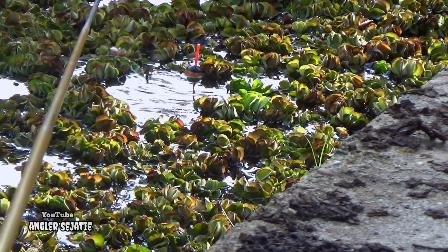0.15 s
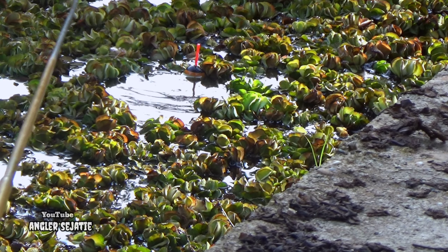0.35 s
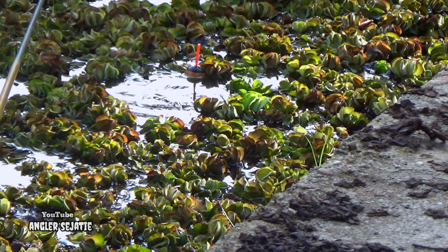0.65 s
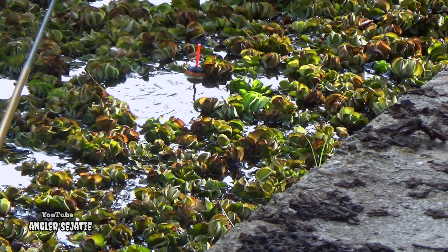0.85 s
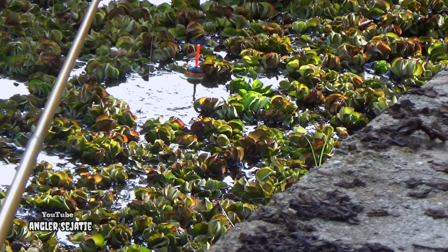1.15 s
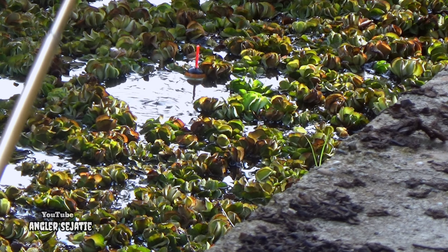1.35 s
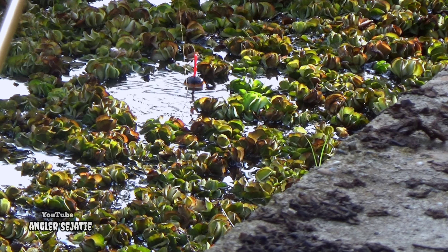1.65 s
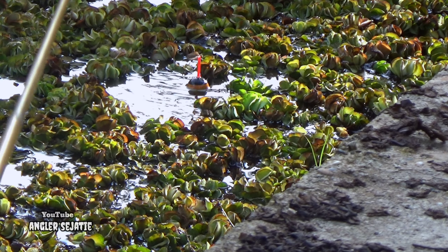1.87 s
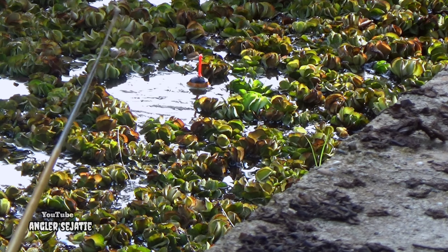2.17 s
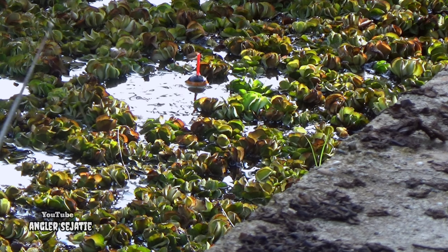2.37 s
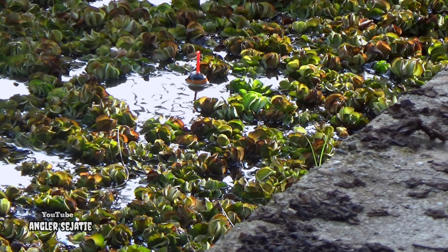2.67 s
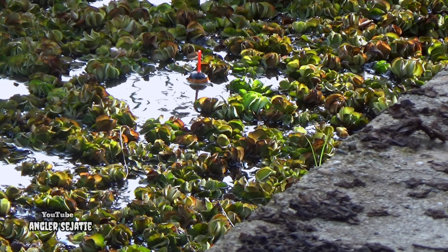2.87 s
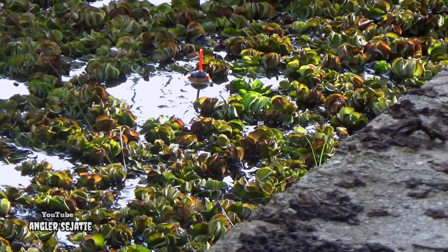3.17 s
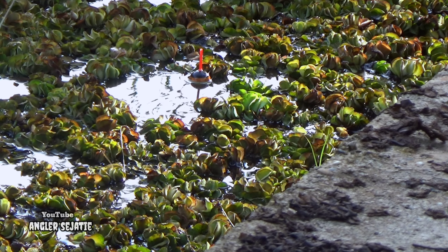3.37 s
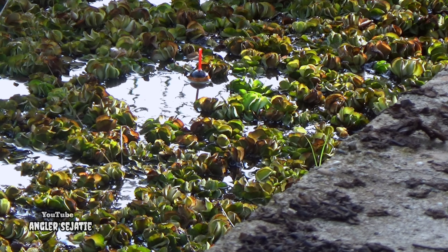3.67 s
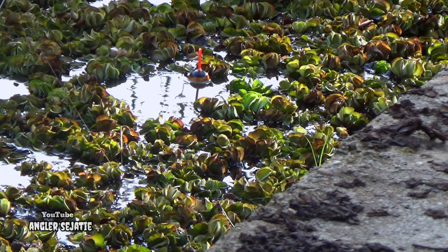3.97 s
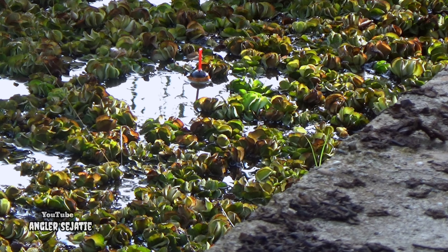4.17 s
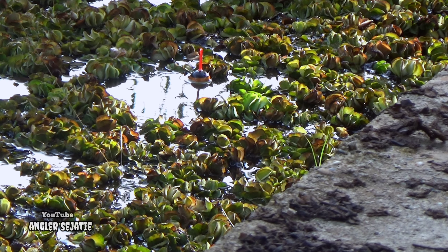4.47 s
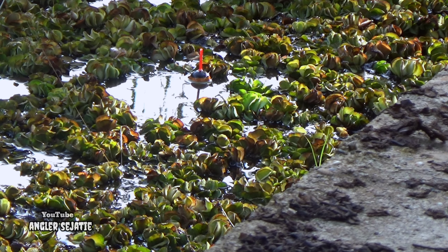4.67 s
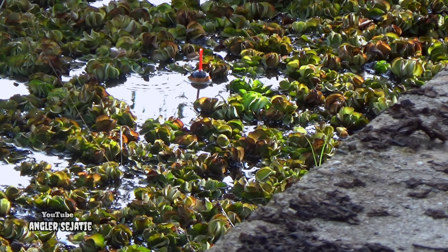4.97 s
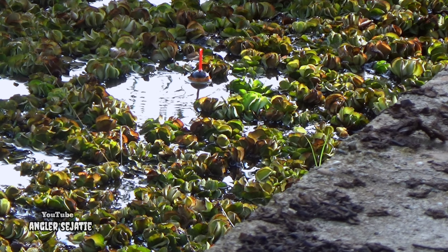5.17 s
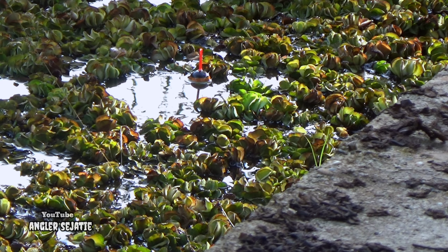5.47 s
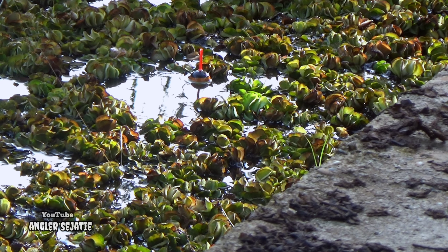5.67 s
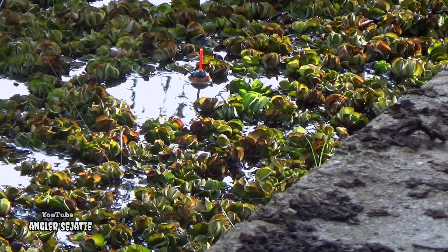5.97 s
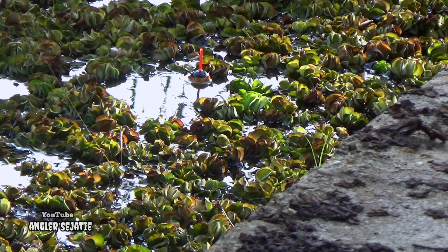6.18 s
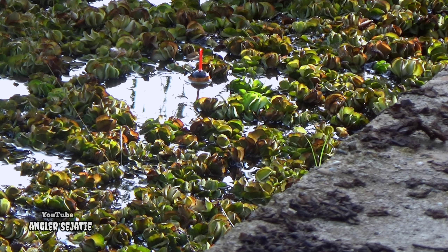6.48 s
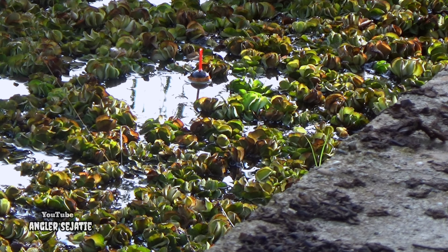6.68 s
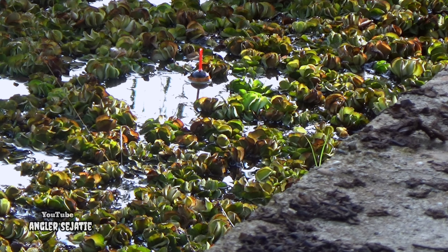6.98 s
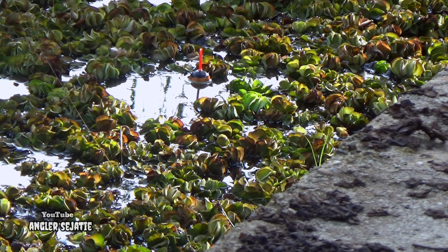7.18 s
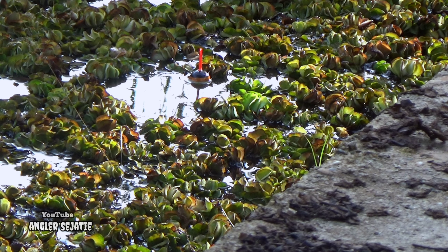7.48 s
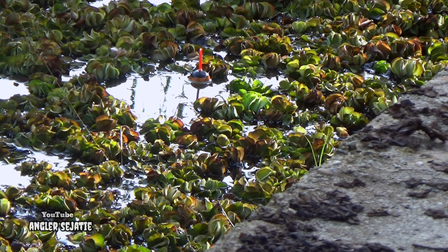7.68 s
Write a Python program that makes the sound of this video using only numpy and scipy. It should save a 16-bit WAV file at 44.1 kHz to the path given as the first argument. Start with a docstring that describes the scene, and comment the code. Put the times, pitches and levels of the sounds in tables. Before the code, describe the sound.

Outdoors by a weedy canal, katydids and crickets drone high and steady over a dull rush of air and faint traffic hum. A small motor ticks rapidly close to the microphone for three seconds, ending around two handling knocks. Fishing gear taps and rustles, then snaps sharply once. A bird on the left whistles a short low phrase at the start, middle and later, with small distant birds chirping.

```python
"""A weedy canal in open country: a dull rush of air, a low rumble, a traffic hum and a faint far engine.
Katydids and crickets drone from the banks as coloured noise and narrow tones, pulsed by wing strokes.
A bird to the left repeats a low whistled phrase of gliding sines; others call far off, softened by echoes.
Close to the microphone a small camera motor ticks for three seconds, each step ringing its modes; the
handled camera knocks twice as a struck body; fishing gear rustles and snaps once in short noise bursts."""
import sys
import numpy as np
from scipy import signal
from scipy.fft import rfft, irfft, next_fast_len
from scipy.io import wavfile
from scipy.ndimage import uniform_filter1d

SR = 44100
rng = np.random.default_rng(int(sys.argv[2]) if len(sys.argv) > 2 else 0)


def master(y):
    """Save y as 16-bit WAV."""
    cut = np.clip(np.atleast_2d(y).T, -1, 1)
    pcm = np.round(cut * 32767)  # scale
    wavfile.write(sys.argv[1], SR, pcm.astype(np.int16))


N = 345303
T = np.arange(N) / SR


def from_db(db):
    """Amplitude ratio of a level in dB."""
    return 10 ** (np.asarray(db) / 20)


def rms_one(x):
    """Scale a signal to an rms of 1."""
    return x / np.sqrt(np.mean(x ** 2) + 1e-20)


def in_time(rows, t=T):
    """The columns of a curve at the times t."""
    s, *columns = np.transpose(rows)
    return [np.interp(t, s, column) for column in columns]


def at_hz(points, hz):
    """A spectrum read on a log-frequency axis."""
    f, value = np.transpose(points)
    return np.interp(np.log(hz + 1), np.log(f), value)


def pan(x, left_db):
    """Place a sound between the two channels; left_db is how much louder the left one is."""
    return x * from_db([[left_db / 2], [-left_db / 2]])


# Left-right likeness of the noises: [f/Hz, correlation]
LEFT_RIGHT_LIKENESS = [(100, 0.99), (180, 0.98), (350, 0.28), (800, 0.086), (2000, 0.061), (5000, 0.69),
                       (9000, 0.72), (12000, 1)]


def noise(spectrum, size=N):
    """Stereo noise of a given colour, more alike in both channels at the ends of the range; mid rms 1."""
    padded = next_fast_len(size)
    hz = np.arange(padded // 2 + 1) * SR / padded
    alike = np.clip(at_hz(LEFT_RIGHT_LIKENESS, hz), 0, 1)
    mid, side = rfft(rng.standard_normal((2, padded))) * from_db(at_hz(spectrum, hz))
    side = side * np.sqrt((1 - alike) / (1 + alike))
    mid, side = irfft(np.array([mid, side]), padded)[:, :size]
    return np.array([mid + side, mid - side]) / mid.std()


def ring(clicks, hz, t60):
    """A two-pole resonance: a unit click sets a sine of height 1 ringing, 60 dB down after t60 s."""
    radius = from_db(-60 / (t60 * SR))
    angle = 2 * np.pi * hz / SR
    poles = [1, -2 * radius * np.cos(angle), radius * radius]
    return signal.lfilter([0, np.sin(angle)], poles, clicks + 1e-18)


def tones(rows):
    """Sharp resonances driven unevenly by noise: narrow wavering lines."""
    out = 0
    for hz, width, db in rows:
        t60 = np.log(1000) / np.pi / width
        out = out + from_db(db) * rms_one(ring(rng.standard_normal(N), hz, t60))
    return out


def scatter(x, t60):
    """Diffuse echoes from banks and trees, different in each channel."""
    t = T[:SR]
    tail = rng.standard_normal((2, SR)) * from_db(-60 * t / t60) * (1 - np.exp(-t / 0.014))
    tail = tail / np.sqrt(np.sum(tail ** 2) / 2)
    return signal.fftconvolve(x[None], tail, axes=1)[:, :N]


def flutter(rate_hz):
    """Smooth chance that changes about rate_hz times a second; rms 1 over all its values."""
    knots = rng.standard_normal(400)
    return rms_one(np.interp(T * rate_hz, np.arange(len(knots)), knots))


def swells(rows, rise_db_per_s, fall_db_per_s, rest_db):
    """Gain of a sound that rises, holds and falls once for each row, and rests at a low level between."""
    levels = []
    for start, length, db in rows:
        before = np.maximum(start - T, 0)
        after = np.maximum(T - start - length, 0)
        levels.append(db - rise_db_per_s * before - fall_db_per_s * after)
    return from_db(np.maximum(np.max(levels, axis=0), rest_db))


# Colour of the open air: [f/Hz, level/dB per Hz]
AIR_COLOUR = [(60, -43), (200, -1), (300, 0), (600, 1), (790, 6.5), (1000, 1), (1500, -1), (2400, -2.5),
              (4000, -5.5), (6000, -8.5), (7500, -9), (13000, -12.5), (15500, -16.5)]


def open_air():
    """The dull rush of open country all around: steady coloured noise."""
    return from_db(-56.0) * pan(noise(AIR_COLOUR), left_db=0.06)


# Colour of the low rumble: [f/Hz, level/dB per Hz]
RUMBLE_COLOUR = [(20, -56), (50, -15), (85, -7.5), (120, -4.5), (150, 3.5), (200, -12), (320, -27.5)]
# The one swell of the rumble: [start t/s, length t/s, level/dB]
RUMBLE_SWELL = [(1.55, 1.33, -63.5)]
# Far traffic hum: [f/Hz, width f/Hz, level/dB]
TRAFFIC_HUM = [(136.9, 5.5, -79), (152.7, 8.2, -79)]


def rumble_and_hum():
    """Low noise that flutters slightly and swells once, with narrow hum lines from far traffic."""
    swell = swells(RUMBLE_SWELL, rise_db_per_s=68, fall_db_per_s=35, rest_db=-70)
    rumble = swell * from_db(.9 * flutter(rate_hz=4)) * noise(RUMBLE_COLOUR)
    return rumble + tones(TRAFFIC_HUM)


# Harmonics of the far engine: [multiple of the firing rate, relative level/dB]
ENGINE_HARMONICS = [(5, -7.5), (6, -0.5), (7, -6), (8, -1.5), (10, -1), (11, 2)]
ENGINE_PEAK_S, ENGINE_HALF_S = 2.55, .6
# level at the peak, and its change half a width away
ENGINE_DB, ENGINE_EDGE_DB = -70, -6
# firing rate at the peak, and its drop half a width away
ENGINE_FIRING_HZ, ENGINE_SAG_HZ = 30.47, 1.7


def far_engine():
    """Harmonics of a firing rate come and go far off, loudest when the engine runs fastest."""
    off_peak = np.minimum(((T - ENGINE_PEAK_S) / ENGINE_HALF_S) ** 2, 10)
    turn = 2 * np.pi * np.cumsum(ENGINE_FIRING_HZ - ENGINE_SAG_HZ * off_peak) / SR
    engine = 0
    for order, db in ENGINE_HARMONICS:
        engine = engine + from_db(db) * np.sin(round(order) * turn + rng.uniform(0, 2 * np.pi))
    return from_db(ENGINE_DB + ENGINE_EDGE_DB * off_peak ** 2) * engine


# Colours of the lower and higher crickets: [f/Hz, level/dB per Hz]
LOW_CRICKET_COLOUR = [(3900, -20.5), (4400, -5.5), (4600, 4.5), (4780, 0.5), (4930, -12), (5150, -35),
                      (5600, -35)]
HIGH_CRICKET_COLOUR = [(4600, -24), (4900, 2.5), (5100, -10), (5300, -9.5), (5600, -24)]
# Trills of the lower and higher crickets, before group gain: [start t/s, length t/s, level/dB]
LOW_CRICKET_TRILLS = [(-.1, .62, -60), (1.03, .6, -60.5), (2.05, 0.35, -62), (2.78, 0.65, -60.5),
                      (3.82, 0.65, -60.5), (4.92, 0.55, -60), (5.97, 0.73, -61), (6.72, 0.72, -60),
                      (7.76, .5, -61)]
HIGH_CRICKET_TRILLS = [(-.1, 0.47, -61), (.75, .68, -61.5), (2.13, 0.38, -60.5), (3.08, .52, -63),
                       (3.95, .42, -63.5), (4.73, 0.61, -63), (5.8, .55, -62.5), (6.78, 0.57, -60.5),
                       (7.74, .5, -67)]
TRILL_SWELL_DB_PER_S, TRILL_FADE_DB_PER_S = 70, 86


def crickets():
    """Two groups of distant crickets trill about once a second; farther ones fill the pauses."""
    low_gain = swells(LOW_CRICKET_TRILLS, TRILL_SWELL_DB_PER_S, TRILL_FADE_DB_PER_S, rest_db=-67.5)
    high_gain = swells(HIGH_CRICKET_TRILLS, TRILL_SWELL_DB_PER_S, TRILL_FADE_DB_PER_S, rest_db=-71)
    low = low_gain * noise(LOW_CRICKET_COLOUR)
    high = from_db(-2.5) * high_gain * noise(HIGH_CRICKET_COLOUR)
    return pan(low + high, left_db=0.9)


# Colour of the throbbing insect: [f/Hz, level/dB per Hz]
THROBBER_COLOUR = [(7800, -27), (8350, 4), (8750, -9), (9050, 5), (9400, -36)]
# Its pure tones, before the throb and a common gain: [f/Hz, width f/Hz, level/dB]
THROBBER_TONES = [(8445, 20, -57), (8756, 22, -55), (8695, 30, -63), (8637, 20, -64)]


def throbber(rest_db=-5.0, duty=0.41):
    """One insect chirps seventeen times a second, each chirp with a sharp start and stop."""
    cycle = (16.945 * T + .2) % 1
    gate = uniform_filter1d(np.where(cycle < duty, 1, from_db(rest_db)), size=130)
    song = from_db(-58.5) * noise(THROBBER_COLOUR) + from_db(-4) * tones(THROBBER_TONES)
    return rms_one(gate) * song


# The buzzer's wing resonances, each ring 60 dB down after 1/width: [f/Hz, width f/Hz, relative level/dB]
BUZZER_WING = [(10850, 330, -6), (11240, 350, -6), (11270, 460, -9), (11730, 210, -10)]


def buzz_wing(drive):
    """The wing resonances, each passed twice, shape the drive; rms 1."""
    out = 0
    for hz, width, db in BUZZER_WING:
        once = ring(drive, hz, 1 / width)
        out = out + from_db(db) * rms_one(ring(once, hz, 1 / width))
    return rms_one(out)


def buzzer():
    """One insect rasps its wings 138 times a second: each stroke is partly a click, partly friction."""
    rate_hz = 138.3 * (1 + .0007 * np.sin(2 * np.pi * .6 * T))
    cycle = np.cumsum(rate_hz) / SR % 1
    click = np.exp(-((cycle - .5) / .004) ** 2)
    friction = rng.standard_normal(N) * np.exp(0.44 * np.cos(2 * np.pi * (cycle - .6)))
    return buzz_wing(friction) + from_db(-9) * buzz_wing(click)


def wing_strokes(rate_hz, wander, sharpness):
    """One pulse of loudness for each stroke of a wing, at a slightly wandering rate; rms 1."""
    knots = np.arange(0, T[-1] + 1, .5)
    rate = rate_hz * (1 + wander * np.interp(T, knots, rng.standard_normal(len(knots))))
    return rms_one(np.exp(sharpness * np.cos(2 * np.pi * np.cumsum(rate) / SR)))


# Colour of the katydid chorus: [f/Hz, level/dB per Hz]
CHORUS_COLOUR = [(7400, -33.5), (7850, -23), (8100, -11.5), (8400, -2.5), (9100, -1.5), (9500, 3),
                 (9950, -0.5), (10400, -7.5), (11100, -36), (12100, -23), (12800, -31.5)]
# Effort of the chorus, before a small lift and flutter: [t/s, level/dB]
CHORUS_EFFORT = [(0, -51.5), (.8, -52.5), (2.15, -49.5), (3.0, -50.5), (5.1, -51), (5.55, -52.5),
                 (6.8, -52), (7.83, -50)]
# Steady pure singers: [f/Hz, width f/Hz, level/dB]
STEADY_SINGERS = [(4633, 27, -71), (6950, 90, -81.5), (8050, 35, -68), (9430, 280, -68), (10970, 25, -66),
                  (11900, 20, -78)]


def katydids():
    """A broad restless chorus on the banks, one fast buzzer above it and a few steady pure singers."""
    effort_db, = in_time(CHORUS_EFFORT)
    gain = from_db(effort_db + 1.0 + 0.81 * flutter(rate_hz=22))
    strokes = wing_strokes(rate_hz=132, wander=0.025, sharpness=0.14)
    chorus = gain * noise(CHORUS_COLOUR) * strokes
    return pan(chorus, left_db=.3) + from_db(-58.0) * buzzer() + tones(STEADY_SINGERS)


def sing(notes, waver):
    """Each note is a near sine that follows its syllable in pitch and loudness."""
    out = np.zeros(N)
    for start, length, hz, db, syllable in notes:
        at = np.flatnonzero((T >= start) & (T < start + length))
        ratio, level_db = in_time(syllable, np.linspace(0, 1, len(at)))
        chance = rms_one(uniform_filter1d(rng.standard_normal(SR), size=120))
        unsteady = 1 + waver * chance[:len(at)]
        phase = 2 * np.pi * np.cumsum(hz * ratio * unsteady) / SR
        edges = signal.windows.tukey(len(at), .1)
        out[at] += from_db(db + level_db) * edges * np.sqrt(2) * np.sin(phase)
    return out


# Syllable shapes: [share of its length, pitch / reference pitch, relative level/dB]
LONG_SLUR = [(0, .74, -7), (.12, .82, -2), (.15, 0.82, 3), (.18, 0.99, -6), (.45, 1, -9), (.7, 0.96, -9.5),
             (.86, .95, -3.5), (.96, 0.82, -10), (1, 0.64, -16)]
SHORT_SLUR = [(0, .76, -5), (.14, .85, 1.5), (.21, 1, -2.5), (.36, 1, -6), (.68, 0.95, -3.5),
              (.86, .9, 2.5), (.94, 0.835, -3), (1, 0.34, -16)]
PIP = [(0, .82, -14), (.25, .92, -2.5), (.55, 0.97, -0.5), (.8, .94, 0), (1, 0.72, -26)]
RISE = [(0, .69, -10), (.15, .82, -1), (.35, .94, 0), (.55, 1, 0), (.75, .97, -2), (1, 1.08, -9)]
# The whistler's phrase, before stretch and distance:
# [t/s after its start, length t/s, reference pitch f/Hz, level/dB, syllable]
WHISTLED_PHRASE = [(0, .186, 1157, -45.5, LONG_SLUR), (0.192, 0.04745, 1031, -44, PIP),
                   (0.263, 0.035, 951, -48.5, PIP), (.351, .053, 1027, -44, PIP),
                   (.479, .128, 1100, -48, SHORT_SLUR)]
# Each time it sings; the first begins before time zero: [start t/s, stretch of the timing]
WHISTLE_STARTS = [(-.441, 1), (2.884, 1), (6.569, .98)]


def whistles():
    """The same phrase every time, its timing stretched: a long slur, three pips, a short slur."""
    notes = []
    for start, stretch in WHISTLE_STARTS:
        for after, length, hz, db, syllable in WHISTLED_PHRASE:
            notes.append((start + stretch * after, stretch * length, hz, db, syllable))
    return notes


# A bird at middle distance and distant birds, before distance loss:
# [start t/s, length t/s, reference pitch f/Hz, level/dB, syllable]
MIDDLE_UPSLURS = [(.415, .15, 1600, -54, RISE), (.822, 0.15, 1591, -54.5, RISE)]
DISTANT_CALLS = [(3.71, 0.089, 5760, -57, PIP), (3.89, .1, 5650, -56, PIP), (4.1, .09, 5530, -57, PIP),
                 (4.68, 0.12, 6800, -59, RISE), (4.865, 0.13, 7000, -57.5, RISE),
                 (6.44, 0.12, 6900, -63, RISE), (6.63, .1, 7030, -63, PIP), (6.96, 0.13, 6700, -57, PIP),
                 (7.03, .09, 3580, -52.5, PIP), (7.21, 0.1, 6350, -61, PIP), (7.48, 0.15, 3580, -54, RISE),
                 (7.71, 0.081, 6470, -57, PIP)]


def birds():
    """A whistler to the left, a bird at middle distance and far callers, each direct and as echoes."""
    near = sing(whistles(), waver=0.0049)
    middle = sing(MIDDLE_UPSLURS, waver=0.015)
    far = sing(DISTANT_CALLS, waver=.03)
    whistler = from_db(-2.0) * pan(near, left_db=10.0) + from_db(-7.5) * scatter(near, t60=0.8)
    upslurs = from_db(-4.5) * middle + from_db(-2.5) * scatter(middle, t60=1.1)
    far_calls = from_db(-6.5) * far + from_db(-7.0) * scatter(far, t60=0.64)
    return whistler + upslurs + far_calls


# Colours of the handling noises: [f/Hz, level/dB per Hz]
THUD = [(30, -32), (75, -2), (115, 0), (170, -9), (260, -15), (900, -45)]
BRUSH = [(1200, -11), (2600, -4), (3200, 5), (4200, -1), (6300, -1.5), (9000, -0.5), (15000, -18)]
TAP = [(100, -45), (1500, -32), (2000, -28), (2500, 4), (3000, -20), (3550, 5), (4200, -25), (6500, -17),
       (12000, -40)]
CRACK = [(60, -30), (200, -16), (900, 6), (1800, -12), (2900, 6), (4300, -13), (6000, 4), (11000, 4),
         (15500, -9)]
SNAP = [(60, -37), (300, -13), (2800, -11.5), (4400, -24), (6000, -5), (7500, -7), (10500, 1.5), (12300, 0),
        (12950, 7), (13300, 10), (13900, 3), (15500, -12)]
BUMP = [(60, -27), (200, -2), (450, 6), (750, 7), (1100, -8), (2500, -7), (8000, -32)]
# Soft thuds as the rod is moved: [t/s, level/dB]
ROD_THUDS = [(1.6, -61), (1.736, -58), (2.01, -60)]
# The line brushes along the rod: [t/s, level/dB, fade to -60 dB t/s]
LINE_BRUSHES = [(3.2111, -42, 0.019), (3.243, -47.5, 0.047), (3.386, -49, 0.11), (3.449, -51, .029),
                (3.466, -51.5, 0.15), (3.497, -49.5, .038), (3.608, -48.5, 0.053), (7.44, -53, .025)]
# Single taps, snaps and bumps of the gear: [t/s, level/dB, rise t/s, fade to -60 dB t/s, colour]
GEAR_CONTACTS = [(3.0115, -31.5, 0.00037, 0.011, TAP), (4.796, -36, 0.0002, 0.0099, CRACK),
                 (4.801, -24.5, .0013, 0.0086, SNAP), (6.02, -53.5, 0.035, 0.13, BUMP)]
THUD_RISE_S, THUD_T60_S = 0.022, 0.31
BRUSH_RISE_SHARE = 0.15   # rise as a share of the fade: long strokes start softly


def contacts():
    """Thuds, taps, brushes and snaps of the line and rod close by: short bursts of friction noise."""
    thuds = [(s, db, THUD_RISE_S, THUD_T60_S, THUD) for s, db in ROD_THUDS]
    brushes = [(s, db, BRUSH_RISE_SHARE * t60, t60, BRUSH) for s, db, t60 in LINE_BRUSHES]
    out, size = np.zeros((2, N)), SR // 4
    for s, db, rise, t60, colour in thuds + brushes + GEAR_CONTACTS:
        at = round(s * SR) - size // 2 + np.arange(size)
        t = T[at] - s
        fade = from_db(db - 60 * np.maximum(t, 0) / t60)
        onset = np.exp(np.minimum(t, 0) / rise)
        out[:, at] += fade * onset * noise(colour, size=size)
    return out


# Knocks on the camera: [t/s, relative level/dB, change per rebound/dB, rattle level/dB, rattle t60 t/s]
CAMERA_KNOCKS = [(2.7252, 0, -5, -1.5, 0.082), (2.7932, -2.5, -3.5, 0, 0.12)]
# Modes of the camera's body: [f/Hz, level/dB, t60 t/s, polarity]
CAMERA_BODY = [(780, -27, 0.012, 1), (1050, -18, 0.0029, -1), (1420, -34.5, 0.017, 1),
               (1980, -5.5, 0.0049, 1), (2105, -7, 0.0059, -1), (2800, -21.5, 0.012, -1),
               (4430, -22, 0.00082, 1), (5610, -37.5, 0.015, -1)]


def knocks():
    """A hard blow, quick rebounds and a dying rattle ring the camera's body as it is handled."""
    bounce_s = .00716
    blows = np.zeros(N)
    for s, db, rebound_db, rattle_db, t60 in CAMERA_KNOCKS:
        for k in range(5):
            extra_loss_db = 2.9 * (k > 0)   # on top of the change per rebound
            at = round(s * SR) + round(k * bounce_s * SR)
            blows[at] += from_db(db + k * rebound_db - extra_loss_db)
        since = np.maximum(T - s, 0)
        grains = rng.standard_normal(N) * (1 - np.exp(-since / 0.0044)) * from_db(-60 * since / t60)
        blows += from_db(db + rattle_db) * grains / np.linalg.norm(grains)
    body = 0
    for hz, db, t60, polarity in CAMERA_BODY:
        body = body + np.sign(polarity) * from_db(db) * ring(blows, hz, t60)
    # a small body radiates no bass
    band = signal.butter(2, [600, 6000], "band", fs=SR, output="sos")
    hit = signal.sosfilt(band, body)
    return pan(hit, left_db=3.5) + from_db(-23) * scatter(hit, t60=0.24)


# Strength of the motor's ticks: [t/s, relative level/dB]
MOTOR_TICK_STRENGTH = [(1.0, -15), (1.5, -0.5), (2.2, -1.5), (2.7, -4)]
MOTOR_STOP_S, MOTOR_RING_DB = 3.0, -3.5


def camera_motor():
    """Twenty-five steps a second by the microphone: a tick, a ring, a short whirr and a softer stop."""
    since = (T - .0067) % .04   # seconds since the last step
    step = np.r_[0, np.diff(since) < 0] * from_db(rng.normal(0, 1.9, N))
    tick_db, = in_time(MOTOR_TICK_STRENGTH)
    # two close modes in a row build up, then die
    ringing = from_db(-60.5) * rms_one(ring(ring(step, 2770, 0.0072), 2816, 0.018))
    high_tick = rms_one(ring(ring(step, 3600, 0.0037), 3470, 0.0043))
    low_tick = rms_one(ring(ring(step, 2570, 0.0041), 2560, 0.0099))
    tick = from_db(-67.0) * (high_tick + low_tick)
    stop_clicks = np.roll(step, round(0.016 * SR))
    stop = from_db(-68.5) * rms_one(ring(ring(stop_clicks, 2420, 0.0095), 2670, 0.017))
    moving = uniform_filter1d(np.where((since > .004) & (since < .018), 1, .45), size=60)
    whirr = tones([(3357, 47, -59)]) * moving
    running = uniform_filter1d(1.0 * (T < MOTOR_STOP_S), size=900)
    motor = from_db(MOTOR_RING_DB) * (ringing + stop + whirr) + from_db(tick_db) * tick
    return pan(running * motor, left_db=3.5)


def scene():
    """All layers, from the far background to the sounds close to the microphone."""
    background = open_air() + rumble_and_hum() + far_engine()
    banks = crickets() + throbber() + katydids() + birds()
    close = contacts() + knocks() + camera_motor()
    return background + banks + close


CUTOFF_HZ = 15550


def record(dry):
    """An elliptic low-pass cuts the top steeply."""
    return signal.sosfilt(signal.ellip(12, .1, 80, CUTOFF_HZ, fs=SR, output="sos"), dry)


dry = scene()
out = record(dry)
master(out)
```